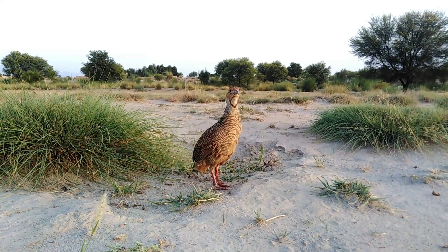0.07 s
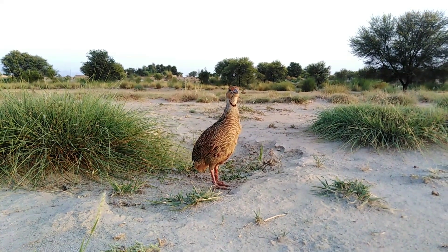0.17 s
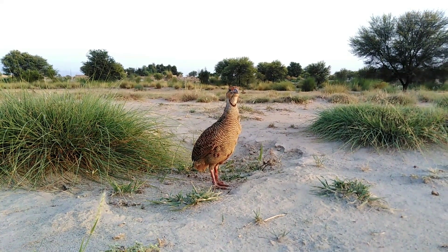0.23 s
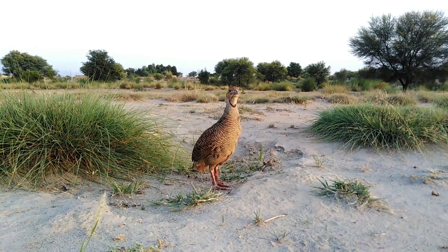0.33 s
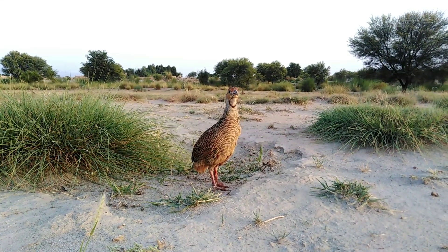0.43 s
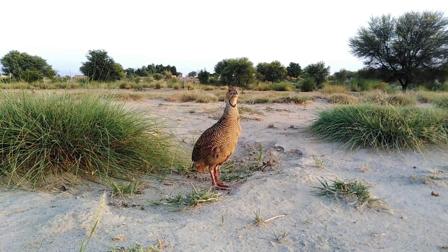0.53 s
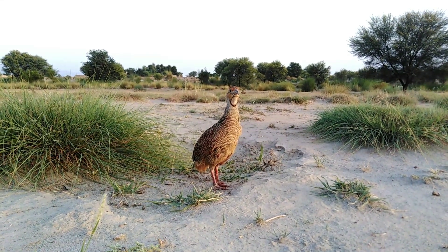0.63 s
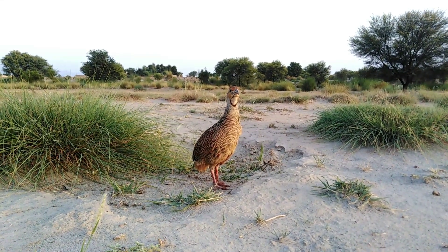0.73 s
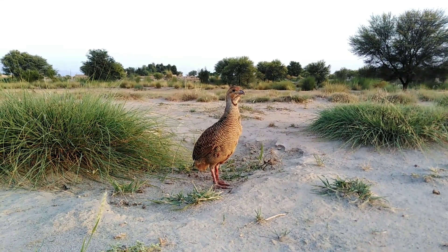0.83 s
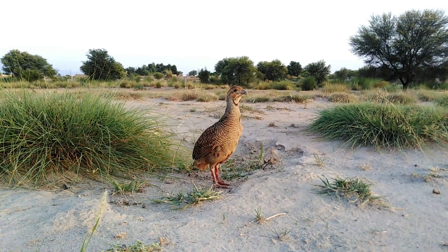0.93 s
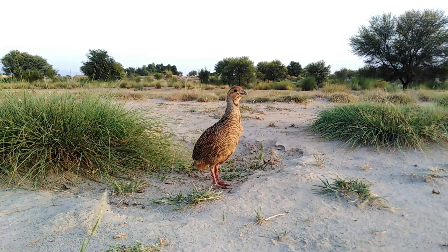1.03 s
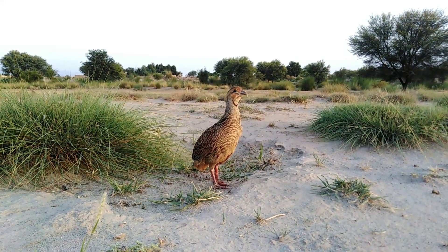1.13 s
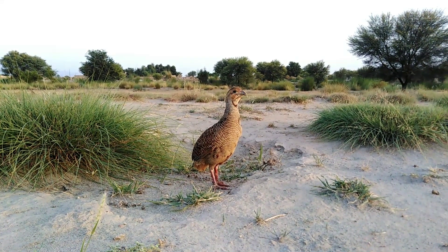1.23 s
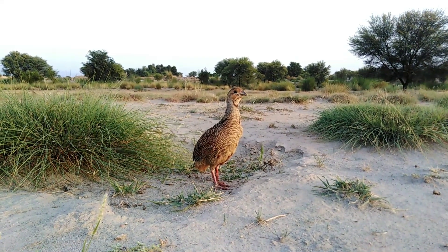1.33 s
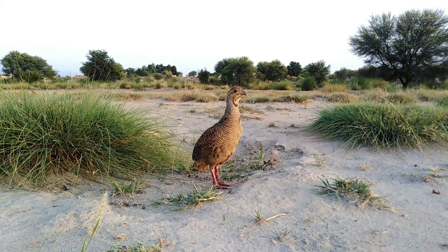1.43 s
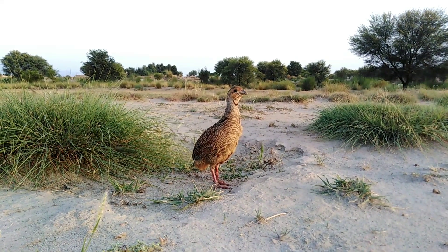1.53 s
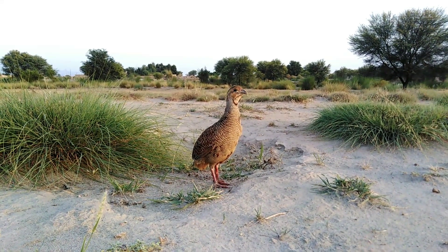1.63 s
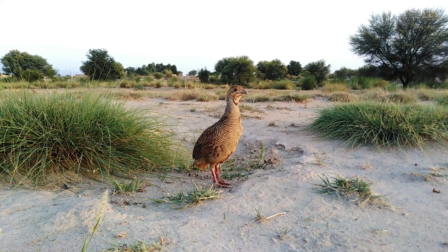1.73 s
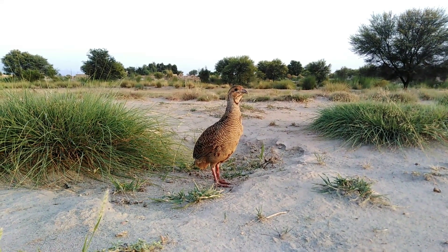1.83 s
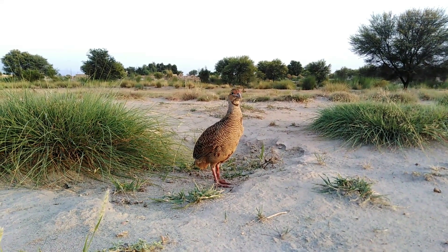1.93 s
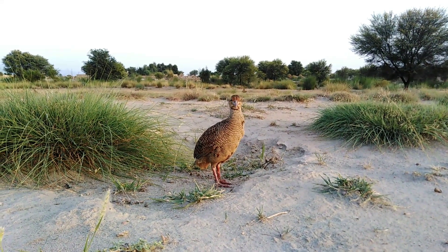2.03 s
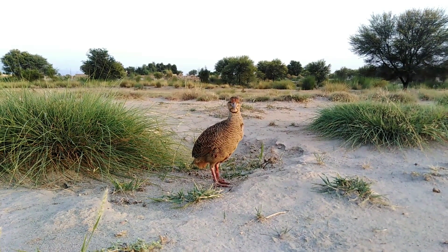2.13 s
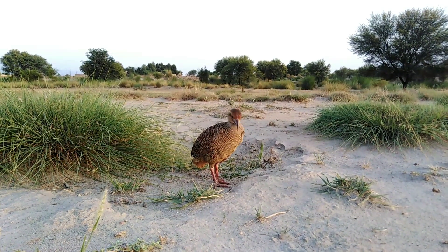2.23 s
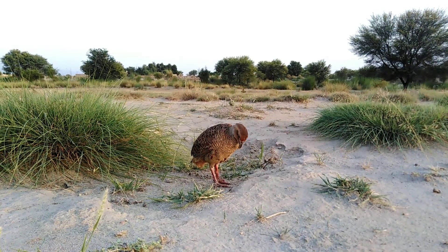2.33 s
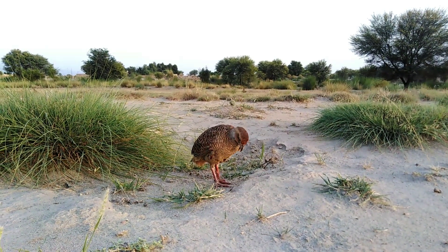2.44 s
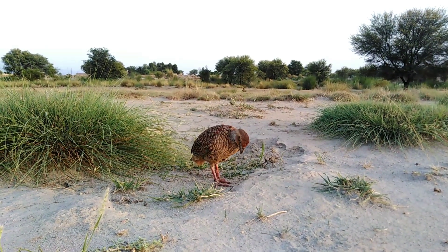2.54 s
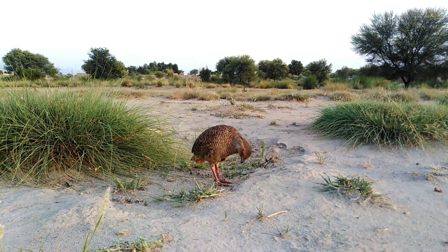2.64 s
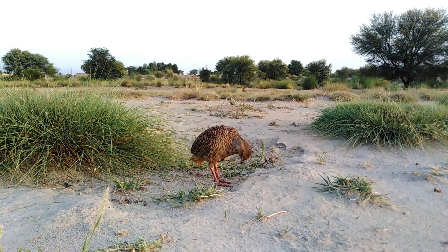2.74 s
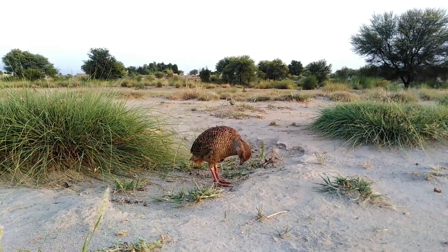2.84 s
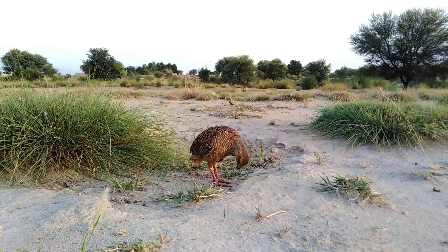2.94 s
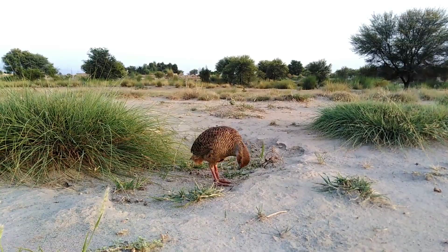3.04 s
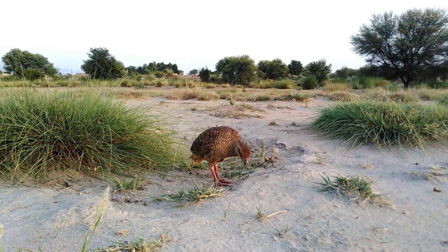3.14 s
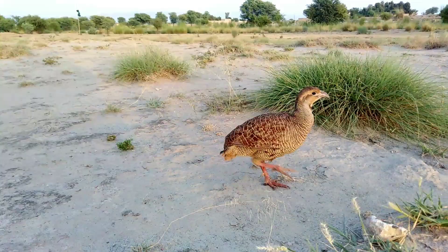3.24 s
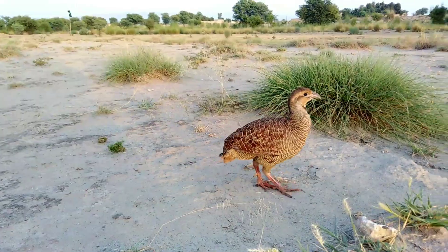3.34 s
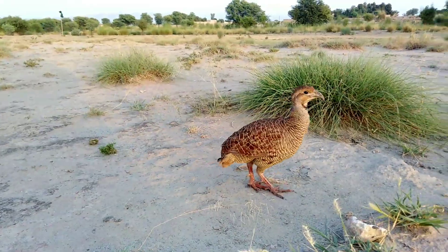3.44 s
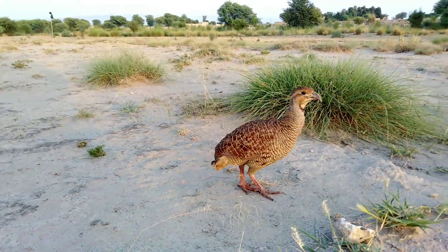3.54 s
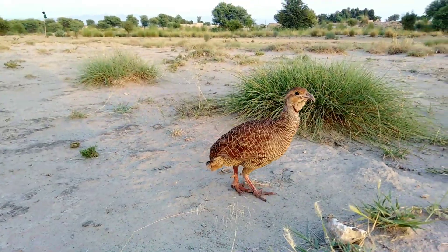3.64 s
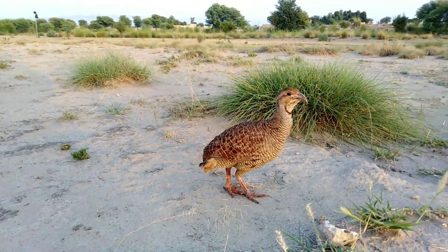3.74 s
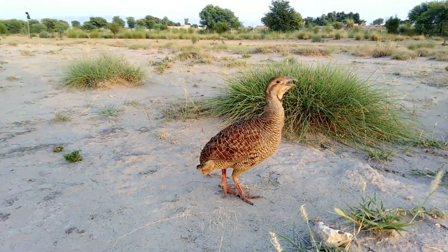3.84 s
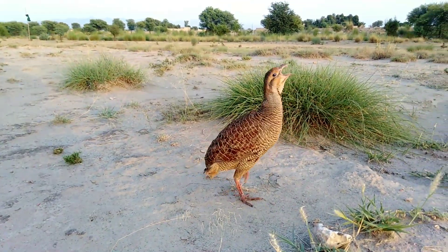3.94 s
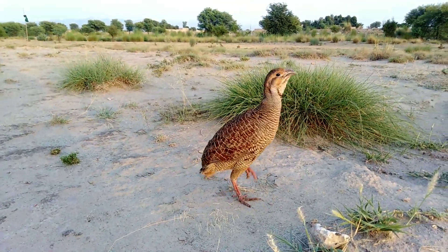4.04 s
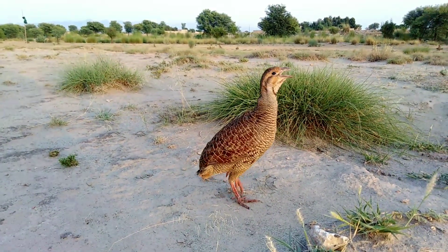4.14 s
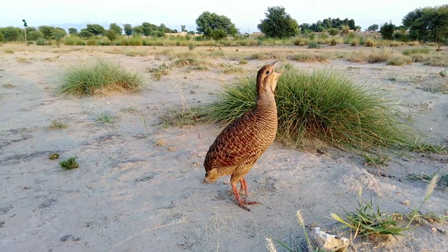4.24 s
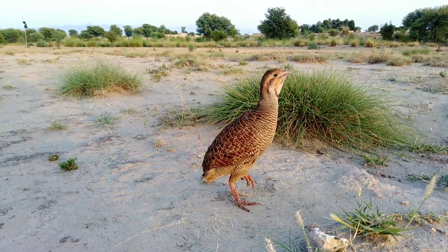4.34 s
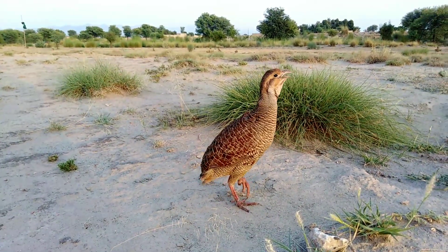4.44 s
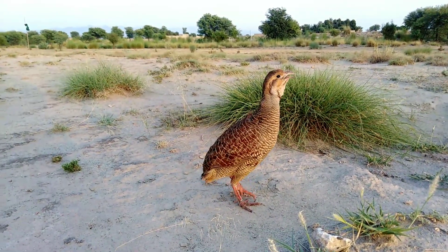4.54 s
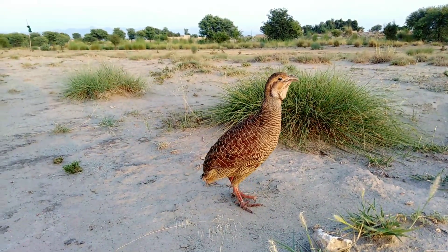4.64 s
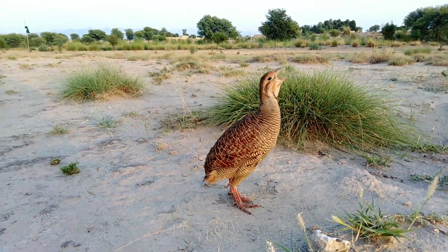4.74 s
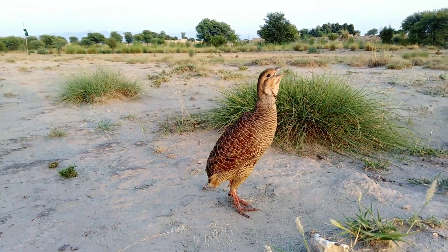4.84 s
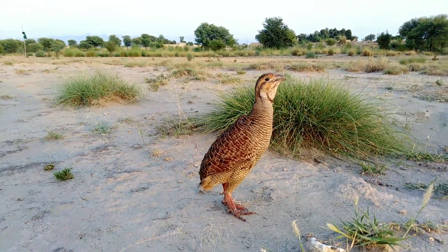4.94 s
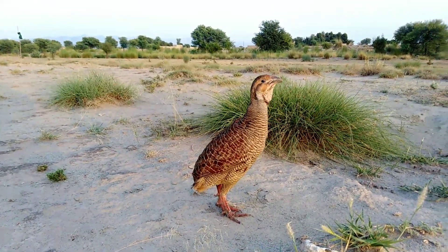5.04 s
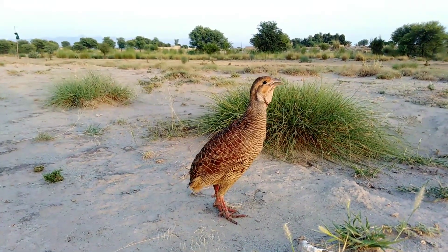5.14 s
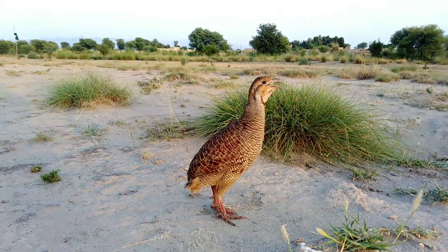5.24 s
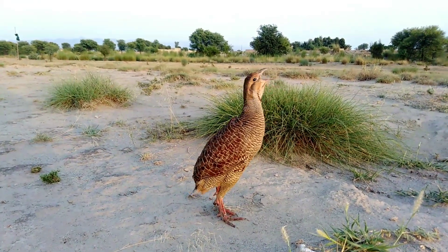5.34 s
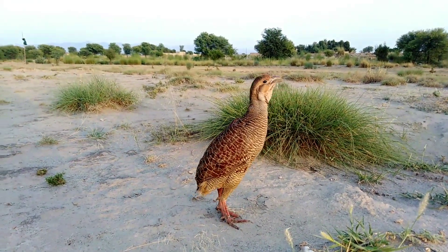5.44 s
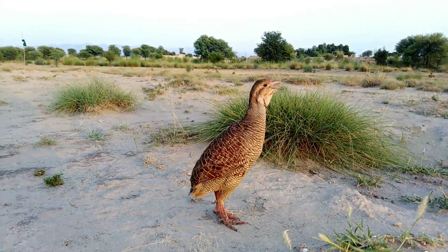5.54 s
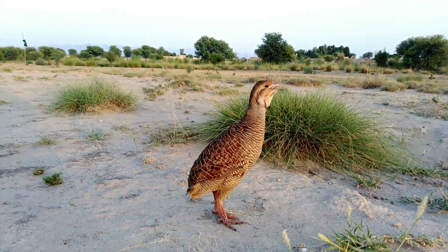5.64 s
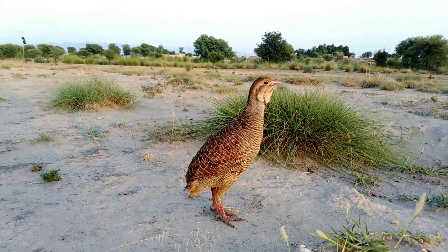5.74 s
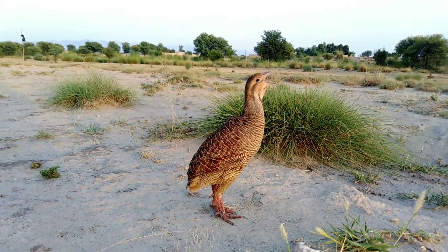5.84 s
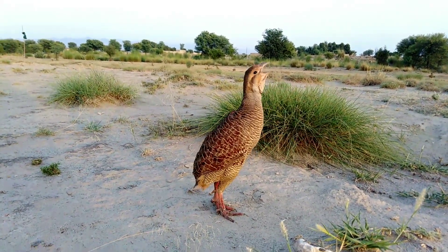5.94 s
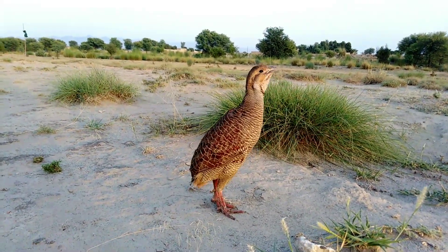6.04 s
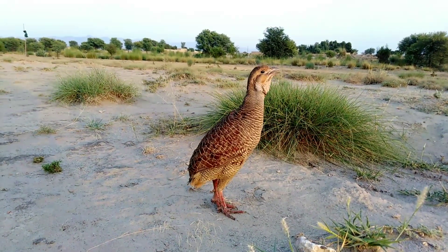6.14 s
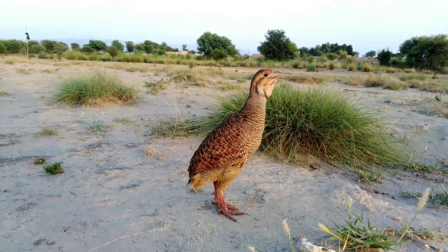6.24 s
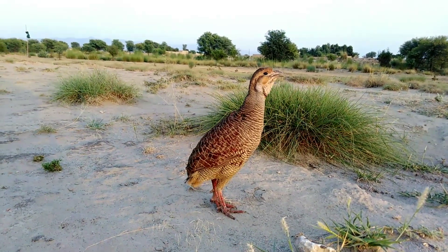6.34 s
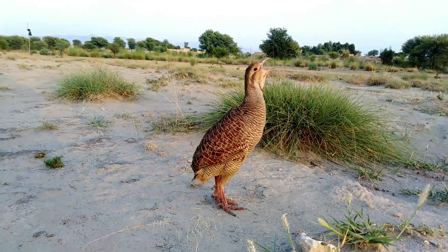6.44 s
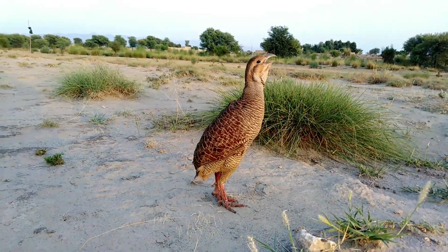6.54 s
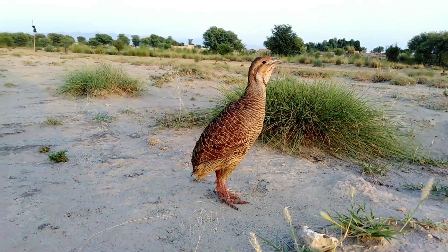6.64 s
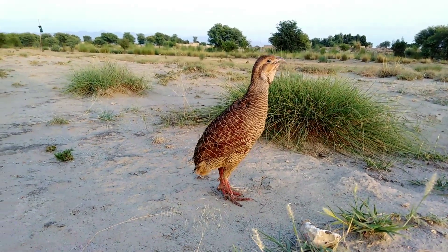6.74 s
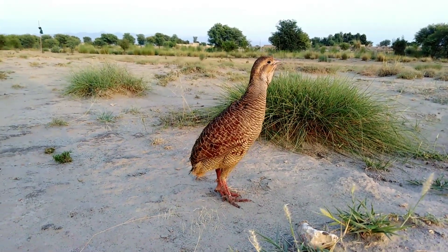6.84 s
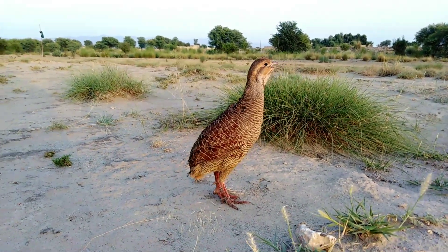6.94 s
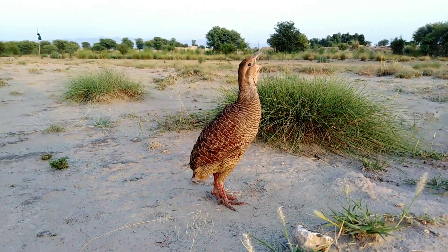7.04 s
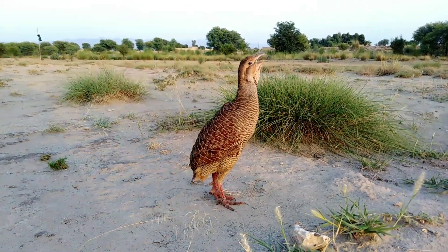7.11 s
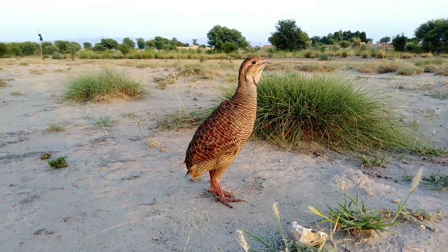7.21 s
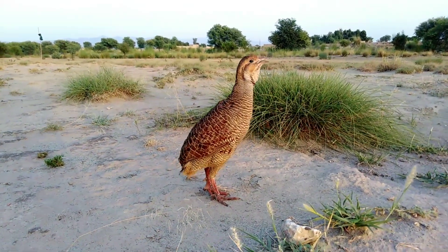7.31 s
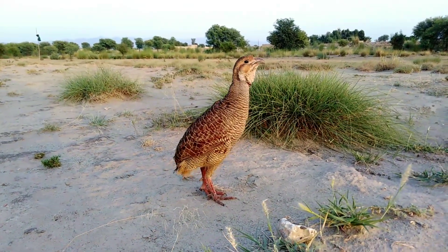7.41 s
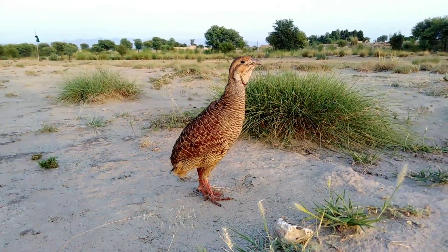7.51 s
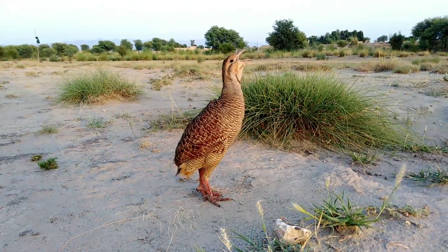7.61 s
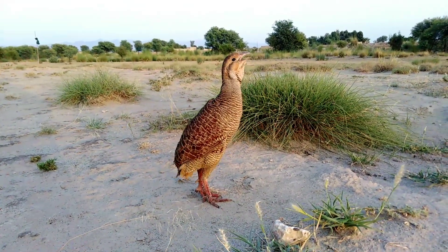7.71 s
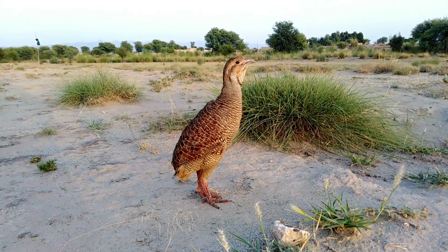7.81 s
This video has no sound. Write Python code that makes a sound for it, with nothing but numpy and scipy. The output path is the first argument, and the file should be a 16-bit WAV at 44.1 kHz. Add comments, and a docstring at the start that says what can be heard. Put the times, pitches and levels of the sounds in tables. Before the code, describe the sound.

A ground bird on open sandy land starts with quiet, falling whimpers and light scuffs, while a crow caws in the distance and a small bird chirps faintly. Then comes one thin whistle and seven quick, harsh three-note phrases, each with a shrill middle note, so close that the microphones distort. A low, far engine rumble continues underneath, and there is only a slight, short echo.

```python
"""A francolin calling on open sandy ground

The bird whimpers softly, whistles, then breaks into a loud three-note phrase, seven times over.
The membranes in its voice box flip between clean tones and harsh chaos, and the calls overload
two close microphones. Far off an engine drones, a small bird chirps and a crow caws.
There are a few light scuffs on the sand, and bushes and ground scatter a short echo."""
import sys
import numpy as np
from scipy import signal
from scipy.fft import rfft, irfft, next_fast_len
from scipy.io import wavfile
from scipy.ndimage import uniform_filter1d

SR = 44100
rng = np.random.default_rng(int(sys.argv[2]) if len(sys.argv) > 2 else 0)


def file_out(sig):
    """Save sig as 16-bit WAV at sys.argv[1]."""
    # one column per channel
    cols = np.atleast_2d(sig).T
    # limit, then scale
    lim = np.clip(cols, -1, 1)
    pcm = np.round(lim * 32767).astype(np.int16)
    wavfile.write(sys.argv[1], SR, pcm)


N = 347054


def amp(db):
    """Turns decibels into a gain to multiply by."""
    return 10 ** (np.asarray(db) / 20)


def unit(x):
    """Scales a signal to an average (rms) level of 1."""
    return x / np.sqrt(np.mean(x ** 2) + 1e-20)


def read(points, hz):
    """Looks up a value between a table's rows, on a log-frequency axis."""
    f, value = np.transpose(points)
    return np.interp(np.log(hz + 1), np.log(f), value)


def add(mix, start_s, sound):
    """Mixes a sound in at its start time."""
    part = mix[:, max(round(start_s * SR), 0):][:, :sound.shape[-1]]
    part += sound[..., :part.shape[-1]]


def shape(x, response):
    """Filters a signal: response gives the gain at each frequency."""
    size = next_fast_len(x.shape[-1] + 1024)
    gain = response(np.fft.rfftfreq(size, 1 / SR))
    return irfft(rfft(x, size) * gain, size)[..., :x.shape[-1]]


def noise(size, spectrum):
    """Noise at level 1 with the given tone colour."""
    return unit(shape(rng.standard_normal(size), lambda f: amp(read(spectrum, f))))


def wander(size, hz):
    """A smooth random wobble, up to about hz times a second."""
    return unit(shape(rng.standard_normal(size), lambda f: np.exp(-(f / hz) ** 2)))


# The engine's rumble, dull early and brighter later. Each row: frequency in Hz, level in dB.
EARLY_RUMBLE = [(25, -27), (48, -17.5), (100, -5.5), (136, 0), (200, -18), (300, -23.5), (450, -41.5),
                (1000, -47.5), (4000, -54), (14000, -58.5)]
LATE_RUMBLE = [(25, -22), (60, -8), (110, -0.5), (160, -8), (250, -17.5), (400, -15), (700, -23.5),
               (1100, -27), (4000, -39.5), (14000, -39.5)]
# Its loudness, with a brief dip between the two. Each row: time in seconds, level in dB.
EARLY_LOUDNESS = [(0, -50.5), (3.17, -50), (3.22, -65), (3.28, -85)]
LATE_LOUDNESS = [(3.27, -110), (3.29, -56), (3.5, -52), (4.498, -47.5), (6, -53), (7.87, -50.5)]
def engine(spectrum, loudness, hum_hz, hum_db, throb, throb_hz, width):
    """A far engine: a throbbing rumble around a wavering hum."""
    t = np.arange(N) / SR
    pitch = hum_hz * (1 + 0.035 * wander(N, 10.3))
    hum = amp(hum_db) * np.sin(2 * np.pi * np.cumsum(pitch) / SR)
    rumble = unit(noise(N, spectrum) + width * noise((2, N), spectrum))
    beat = 1 + throb * np.sin(2 * np.pi * throb_hz * t)
    return amp(np.interp(t, *np.transpose(loudness))) * unit((rumble + hum) * beat)


def slide(length_s, first_hz, last_hz, arch, peak_share, fade_db):
    """Pitch and level of a quiet note: one arched glide that swells to a peak and fades."""
    progress = np.linspace(0, 1, int(length_s * SR))
    pitch = first_hz * (last_hz / first_hz) ** progress * 2 ** (arch * np.sin(np.pi * progress))
    slope_share = np.where(progress < peak_share, peak_share, 1 - peak_share)
    return pitch, fade_db * np.abs(progress - peak_share) / slope_share


def tone(pitch, db, overtone_db, waver):
    """A wavering tone with two overtones, each weaker than the last."""
    phase = 2 * np.pi * np.cumsum(pitch * (1 + waver * wander(len(pitch), 200))) / SR
    partials = sum(amp(overtone_db * k) * np.sin((k + 1) * phase) for k in range(3))
    return amp(db) * unit(partials) * signal.windows.tukey(len(pitch), .05)


# A small bird's notes. Each row: start and length in seconds, first and last pitch in Hz, level in dB.
CHIRP_NOTES = [(.002, 0.042, 5000, 4300, -58), (.045, 0.05, 4720, 7100, -63),
               (0.093, 0.031, 3800, 3340, -59.5), (.675, 0.038, 5000, 4150, -64),
               (2.765, 0.034, 4900, 4450, -65), (2.791, 0.051, 4520, 6800, -57.5),
               (2.83, 0.068, 4700, 3150, -61)]
def chirps():
    """A small bird's quiet, almost pure gliding notes."""
    out = np.zeros((2, N))
    for start, length, first_hz, last_hz, db in CHIRP_NOTES:
        pitch, swell_db = slide(length, first_hz, last_hz, arch=0.018, peak_share=0.35, fade_db=-6)
        add(out, start, tone(pitch, db + swell_db, overtone_db=-35, waver=0.018))
    return out


# Scuffs on the sand. Each row: start in seconds, level in dB, seconds to fade by 60 dB.
SAND_SCUFFS = [(.005, -58.5, 0.51), (1.577, -46.5, 0.053), (3.284, -46.5, 0.19), (3.318, -46, 0.051),
               (3.361, -45, 0.025)]
# The sand's tone colour. Each row: frequency in Hz, level in dB.
SAND_COLOUR = [(300, -14), (1000, -1), (3500, 3), (5500, 0.5), (9000, -8), (14000, -4.5)]
def scuffs():
    """Scuffed sand: gritty bursts of noise that die away."""
    out = np.zeros((2, N))
    t = np.arange(SR // 4) / SR
    for start, db, fade_s in SAND_SCUFFS:
        fade = np.exp(-np.log(1000) * t / fade_s)
        add(out, start, amp(db) * fade * noise((2, len(t)), SAND_COLOUR))
    return out


def syrinx(pitch, rough, jitter, shimmer, breath, chaos_hz, hiss=0.15, dull_db=0):
    """A bird's voice box: roughness shakes its membranes' pitch and swing, and adds breath noise."""
    size = len(pitch)
    chaos = rough ** 1.661  # slight roughness leaves the pitch almost steady
    shaky_pitch = pitch * (1 + jitter * chaos * wander(size, chaos_hz))
    phase = 2 * np.pi * np.cumsum(shaky_pitch) / SR
    swings = np.exp(shimmer * rough * wander((5, size), chaos_hz))
    fade = amp(-dull_db * rough)  # a chaotic swing closes less sharply, so its overtones weaken
    membranes = unit(sum(swing * fade ** k * np.cos((k + 1) * phase) for k, swing in enumerate(swings)))
    return membranes + (hiss + breath * rough) * rng.standard_normal(size)


# The crow's caws. Each row: start and length in seconds, first pitch in Hz, level in dB,
# brightness in dB per octave.
CROW_CAWS = [(0.962, 0.095, 780, -42.5, 11), (1.215, .11, 761, -44.5, 10), (2.637, .1, 761, -51, -6),
             (2.885, 0.11, 783, -52, -15)]
# How its throat colours them. Each row: frequency in Hz, gain in dB.
CROW_COLOUR = [(400, -33), (750, 8), (1050, 7.5), (1550, 7.5), (2300, -5.5), (3400, -35), (4500, -31),
               (7000, -52)]
def crow():
    """Hoarse, breathy caws that arch in pitch and level, and end lower than they begin."""
    out = np.zeros((2, N))
    for start, length, hz, db, bright_db in CROW_CAWS:
        pitch, swell_db = slide(length, hz, hz * .86, arch=0.101, peak_share=0.44, fade_db=-17)
        source = syrinx(pitch, rough=0.54, jitter=0.059, shimmer=0.75, breath=2.9, chaos_hz=200)
        voice = shape(source, lambda f: amp(read(CROW_COLOUR, f) + bright_db * np.log2(1 + f / hz)))
        add(out, start, amp(db + swell_db) * unit(voice) * signal.windows.tukey(len(pitch), .2))
    return out


# The francolin's whimpers. Each row: start and length in seconds, first and last pitch in Hz,
# level in dB, arch of the pitch in octaves.
WHIMPER_NOTES = [(2.114, 0.056, 1370, 1030, -48, 0), (2.151, 0.056, 1232, 1124, -42.5, 0.32),
                 (2.203, 0.053, 1150, 917, -46, -0.069), (2.259, 0.034, 1005, 950, -53, .48),
                 (2.311, 0.073, 908, 405, -45.5, -0.21), (3.282, 0.04, 703, 597, -39, -.08),
                 (3.557, 0.059, 1323, 980, -42, 0.33), (3.612, .17, 642, 308, -38, -.22)]
def whimpers(hoarse_hz=800, hoarse=0.21, muffle_hz=1500):
    """Soft falling whines through a closed beak, which turn hoarse as the pitch sinks."""
    out = np.zeros((2, N))
    for start, length, first_hz, last_hz, db, arch in WHIMPER_NOTES:
        pitch, swell_db = slide(length, first_hz, last_hz, arch, peak_share=.3, fade_db=-7)
        rough = hoarse / (1 + (pitch / hoarse_hz) ** 4)
        source = syrinx(pitch, rough, jitter=.1, shimmer=0.97, breath=.5, chaos_hz=200,
                        hiss=.025, dull_db=42)
        voice = unit(shape(source, lambda f: 1 / (1 + (f / muffle_hz) ** 3)))
        add(out, start, amp(db + swell_db) * voice * signal.windows.tukey(len(pitch), .1))
    return out


# Whistles before the first phrase. Each row: start and length in seconds, pitch in Hz, level in dB,
# swell time in seconds, how far below pitch it starts in Hz.
WHISTLE_NOTES = [(3.652, 0.253, 3460, -13.5, 0.035, 329), (3.913, 0.019, 3460, -21, .001, 3.5)]
# The rush of air around them. Each row: frequency in Hz, level in dB.
AIR_COLOUR = [(180, -70), (300, -43.5), (681, -30.5), (800, -31.5), (1650, -26), (2310, -30.5),
              (3240, -23.5), (3510, -9), (3810, -25.5), (5970, -31), (7130, -30.5), (8640, -48.5),
              (14000, -50.5)]
def whistle(flutter_db=0.95, pan_db=5.0, lift_hz=170, lift_s=0.012, air_from_s=3.648, air_to_s=3.94):
    """A thin, fluttering whistle in a rush of air: it scoops up as it swells and lifts at its end."""
    out = np.zeros((2, N))
    for start, length, hz, db, swell_s, scoop_hz in WHISTLE_NOTES:
        t = np.arange(0, length, 1 / SR)
        slack = np.exp(-t / swell_s)
        end_lift = lift_hz * np.exp((t - length) / lift_s)
        pitch = (hz - scoop_hz * slack + end_lift) * (1 + 0.007 * wander(len(t), 22))
        level_db = db - 36 * slack + flutter_db * wander(len(t), 67)
        note = tone(pitch, level_db, overtone_db=-32.5, waver=0.0028)
        add(out, start, note * amp([[pan_db], [-pan_db]]))
    size = int((air_to_s - air_from_s) * SR)
    add(out, air_from_s, amp(-27) * signal.windows.tukey(size, .12) * noise((2, size), AIR_COLOUR))
    return out


def gate(t, start, end, edge_s):
    """1 between start and end, 0 outside, with soft edges."""
    return (np.tanh((t - start) / edge_s) - np.tanh((t - end) / edge_s)) / 2


def gesture(locks, length_s, attack_s, release_s, hold_db, low_hz, high_hz, climb_s, harsh,
            break_db, bend, break_s=0.0053, break_hz=1837, flip_s=0.0011, linger_s=0.0039):
    """Pitch, roughness and effort of a harsh cry whose membranes briefly lock into clear tones."""
    t = np.arange(0, length_s, 1 / SR)
    letting_go = np.clip(1 - (length_s - t) / release_s, 0, 1)
    effort_db = hold_db - 30.5 * np.exp(-t / attack_s) - 39 * letting_go ** 2.2
    pitch = low_hz + (high_hz - low_hz) * gate(t, climb_s, length_s - release_s, edge_s=0.0023)
    rough = harsh + (1 - harsh) * letting_go
    # around each lock the voice breaks: a high pitch drops to break_hz and the level shifts
    breaking = np.max([gate(t, start - break_s, end + break_s, flip_s) for start, end, *_ in locks], 0)
    pitch -= breaking * np.maximum(pitch - break_hz, 0)
    effort_db += break_db * breaking
    for start, end, first_hz, last_hz, lift_db, lock_rough in locks:
        locked = gate(t, start, end, flip_s)
        glide = first_hz + (last_hz - first_hz) * np.clip((t - start) / (end - start), 0, 1) ** bend
        # when a lock lets go, the pitch takes a moment to slide away
        lingering = (t > (start + end) / 2) * np.exp(-np.maximum(t - end, 0) / linger_s)
        pitch += np.maximum(locked, lingering) * (glide - pitch)
        rough += locked * (lock_rough - rough)
        effort_db += locked * (lift_db - break_db)
    return pitch, rough, effort_db


def stretched(controls, factor):
    """The same control curves, played slower or faster."""
    steps = np.arange(len(controls[0]))
    return [np.interp(np.arange(0, len(steps), 1 / factor), steps, curve) for curve in controls]


def microphones(voice, balance, twist, lag_s=.000025, twist_hz=2310, width_hz=330):
    """The right microphone hears the call later, and direct and ground paths meet differently there."""
    def phase_lag(f):
        return 2 * np.pi * f * lag_s + twist * np.exp(-((f - twist_hz) / width_hz) ** 4)
    left = shape(voice, lambda f: amp(read(balance, f) / 2))
    right = shape(voice, lambda f: amp(-read(balance, f) / 2) * np.exp(-1j * phase_lag(f)))
    return np.array([left, right])


def syllables(calls, controls, colour, balance, ragged=.07, **voice_settings):
    """Plays one kind of cry at each of its times: voice box, then throat and beak, then microphones."""
    out = np.zeros((2, N))
    for start, stretch, tune, db, twist in calls:
        pitch, rough, effort_db = stretched(controls, stretch)
        # no two cries are quite alike: effort and roughness drift by chance
        effort_db += 1.5 * wander(len(pitch), 54)
        rough += ragged * np.abs(wander(len(pitch), 77))
        source = syrinx(pitch * tune, np.clip(rough, 0, 1), **voice_settings)
        voice = shape(source, lambda f: amp(read(colour, f)))
        # effort alone sets the loudness, whichever overtone the throat favours
        voice /= np.sqrt(uniform_filter1d(voice ** 2, size=260) + 1e-9)
        voice *= amp(effort_db + db)
        add(out, start, microphones(voice, balance, twist))
    return out


# The opening cry. Each row: start in seconds, length factor, pitch factor, gain in dB,
# phase twist between the microphones near the shriek's pitch in radians.
OPENER_CALLS = [(3.932, 0.98, 0.99, 1.5, -0.5)]
# Its locks into clear tones, before those factors. Each row: start and end in seconds into the cry,
# first and last pitch in Hz, lift in dB, roughness from 0 to 1.
OPENER_TONES = [(.037, .069, 1846, 1883, 2.5, 0), (.089, .134, 1880, 1348, -0.5, 0)]
# How throat and beak colour it. Each row: frequency in Hz, gain in dB.
OPENER_COLOUR = [(500, -29.5), (1000, -18), (1500, 2), (1900, -8), (2700, -1.5), (3700, -19.5),
                 (4700, -17.5), (5600, -7.5), (6600, -18), (9000, -20.5), (14000, -53.5)]
# Stereo balance of the opener and the rasps. Each row: frequency in Hz, left over right in dB.
OPENER_RASP_BALANCE = [(1400, -5.5), (2000, -5), (2450, -8), (3000, 4.5), (4900, 4.5), (10000, 6)]
def opener():
    """The harsh cry that starts the first phrase; it clears twice, the second time into a falling tone."""
    cry = gesture(OPENER_TONES, length_s=.154, attack_s=0.0036, release_s=0.018, hold_db=-7.5,
                  low_hz=1500, high_hz=2530, climb_s=0.016, harsh=0.53, break_db=-8.5, bend=1.3)
    return syllables(OPENER_CALLS, cry, OPENER_COLOUR, OPENER_RASP_BALANCE, jitter=0.075,
                     shimmer=0.88, breath=1.0, hiss=0.13, dull_db=-0.5, chaos_hz=498)


# The shrieks' calls, clear tone, throat colour and stereo balance. Rows read as for the opener.
SHRIEK_CALLS = [(4.076, 0.94, 0.98, 0.0074, 2.99), (4.611, 0.95, 0.99, 0.0069, 2.7),
                (5.130, 0.93, 0.99, 0.017, 2.74), (5.691, 0.94, 0.99, 0.0067, 2.85),
                (6.264, 0.98, 0.99, 0.014, 2.5), (6.841, 0.96, 0.99, 0.028, 1.74),
                (7.428, 0.94, 0.99, 0.0076, 0.7)]
SHRIEK_TONES = [(.046, .129, 2288, 2352, 7.8, 0.034)]
SHRIEK_COLOUR = [(500, -29), (950, 0.5), (1450, -14), (2300, 8), (3100, 3.5), (3800, -1.5), (4600, -6),
                 (5700, -4), (7500, -15.5), (14000, -16.5)]
SHRIEK_BALANCE = [(1400, -3), (2300, 15.5), (3000, 12), (4600, 4.5), (6900, 23.5), (10000, 11.5)]
def shrieks():
    """The loud middle note of each phrase: one long piercing tone between two harsh bursts."""
    cry = gesture(SHRIEK_TONES, length_s=.172, attack_s=0.0049, release_s=.039, hold_db=-2.0,
                  low_hz=1422, high_hz=1600, climb_s=0.012, harsh=.7, break_db=-3.0, bend=0.8)
    return syllables(SHRIEK_CALLS, cry, SHRIEK_COLOUR, SHRIEK_BALANCE, ragged=0.037, jitter=0.1022,
                     shimmer=0.73, breath=0.91, hiss=0.05, dull_db=2.0, chaos_hz=409)


# The rasps' calls, clear tones and throat colour. Rows read as for the opener.
RASP_CALLS = [(4.246, 0.81, 0.94, 0.76, -0.69), (4.764, 0.92, 0.96, 0.33, -0.98),
              (5.317, 0.96, 0.99, 0.79, -0.99), (5.886, 0.99, 0.99, 0.77, -0.69),
              (6.457, 1.0, 0.99, 1, 0.31), (7.051, 0.98, 1, 1, 0.68), (7.630, 0.97, 0.99, 0.5, -0.87)]
RASP_TONES = [(.008, .02, 1749, 1785, 2.6, 0.13), (.046, .068, 2464, 2475, 5.6, 0.043),
              (.098, .143, 2460, 2060, 1.5, .03)]
RASP_COLOUR = [(500, -54.5), (1000, -4), (1450, 2), (2400, 2), (2800, 5), (3650, -3.5), (4300, 1),
               (5000, 10.5), (5600, 12), (6500, 1.5), (7500, -3.5), (14000, -40)]
def rasps():
    """The last note of each phrase: a very rough cry that locks into a tone three times."""
    cry = gesture(RASP_TONES, length_s=.174, attack_s=.003, release_s=.028, hold_db=-9.5,
                  low_hz=1420, high_hz=2613, climb_s=.018, harsh=0.83, break_db=-0.5, bend=1.7)
    return syllables(RASP_CALLS, cry, RASP_COLOUR, OPENER_RASP_BALANCE, ragged=0.1043, jitter=0.12,
                     shimmer=0.44, breath=0.39, hiss=0.22, dull_db=14.5, chaos_hz=499)


# The chucks' calls, clear tones, throat colour and stereo balance. Rows read as for the opener.
CHUCK_CALLS = [(4.468, 0.93, 0.94, -0.69, -0.92), (5.011, 0.97, 0.97, 0.39, -0.48),
               (5.575, 0.95, 0.98, 0.29, 0.048), (6.147, 0.96, 0.98, -0.032, 0.48),
               (6.720, 0.98, 1.0, 0.57, 0.64), (7.310, 0.97, 0.96, -0.69, 0.53)]
CHUCK_TONES = [(.022, .034, 1494, 1510, -1.5, 0.27), (.035, .06, 2027, 1673, -4.5, 0.033)]
CHUCK_COLOUR = [(500, -32), (1000, 0), (1450, 7), (2000, -2), (2900, -7.5), (3700, -15), (4500, -20),
                (5700, 1.5), (6600, -11), (9000, -23.5), (14000, -31)]
CHUCK_BALANCE = [(1400, -4), (2000, -8), (3000, 5.5), (4000, -4.5), (5700, 6.5), (10000, -5)]
def chucks():
    """The short, rough note that starts every phrase after the first."""
    cry = gesture(CHUCK_TONES, length_s=0.075, attack_s=0.003, release_s=0.031, hold_db=-7,
                  low_hz=1388.6, high_hz=1483, climb_s=.005, harsh=0.677, break_db=0.5, bend=2.4)
    return syllables(CHUCK_CALLS, cry, CHUCK_COLOUR, CHUCK_BALANCE, jitter=0.133,
                     shimmer=0.81, breath=1.0, hiss=0.33, dull_db=4.0, chaos_hz=402)


# The stutter's call and clear tone. Rows read as for the opener.
STUTTER_CALLS = [(4.579, 0.89, 0.91, 0.0014, 0.74)]
STUTTER_TONES = [(.02, .038, 1462, 1545, 4, 0.17)]
def stutter():
    """One extra, breathy chuck just before the second shriek."""
    cry = gesture(STUTTER_TONES, length_s=.05, attack_s=.003, release_s=0.013, hold_db=-10.5,
                  low_hz=1529, high_hz=1452, climb_s=0.011, harsh=0.63, break_db=2.5, bend=1.4)
    return syllables(STUTTER_CALLS, cry, CHUCK_COLOUR, CHUCK_BALANCE, jitter=0.078,
                     shimmer=0.7, breath=1.0, hiss=1.0, dull_db=12, chaos_hz=400)


# How long the echo lasts. Each row: frequency in Hz, seconds to fade by 60 dB.
ECHO_FADE = [(300, .45), (2000, 0.27), (5000, 0.27), (12000, 0.2)]
def field_echo(sound, echoes_per_s=2000):
    """Bushes and ground scatter the sound into sparse echoes whose treble dies first."""
    taps = rng.standard_normal((2, SR // 2)) * (rng.random((2, SR // 2)) < echoes_per_s / SR)
    hz, t, bands = signal.stft(taps, SR, nperseg=256)
    fade = np.exp(-np.log(1000) * t / read(ECHO_FADE, hz)[:, None])
    tail = signal.istft(bands * fade, SR)[1]
    return signal.fftconvolve(sound, tail / np.linalg.norm(tail[0]), axes=1)[:, :N]


def scene():
    """The francolin's loud calls close and dry, the quiet sounds echoing, the engine behind them all."""
    near = opener() + stutter() + chucks() + rasps() + whistle()
    loud = shrieks()
    soft = whimpers() + scuffs()
    far = crow() + chirps()
    early_drone = engine(EARLY_RUMBLE, EARLY_LOUDNESS, hum_hz=130.5, hum_db=-2,
                         throb=0.14, throb_hz=12.0, width=0.51)
    late_drone = engine(LATE_RUMBLE, LATE_LOUDNESS, hum_hz=114, hum_db=-1.5,
                        throb=0.35, throb_hz=4.0, width=.9)
    # the shriek is thrown upward, so less of it scatters back from the bushes
    echo = field_echo(amp(-37.5) * near + amp(-43.5) * loud + amp(-8.0) * soft + amp(-3.0) * far)
    return near + loud + soft + far + echo + early_drone + late_drone


def record(dry, ceiling=0.63, lopsided=0.17, low_hz=8, high_hz=14400):
    """The microphones overload hard and a little unevenly; the lowest bass and top treble are cut."""
    upsampled = signal.resample_poly(dry, 160, 147, axis=1) / ceiling
    flattened = upsampled / (1 + np.abs(upsampled) ** 10) ** (1 / 10)
    uneven = flattened + lopsided * flattened ** 4 * (flattened > 0)
    clipped = ceiling * signal.resample_poly(uneven, 147, 160, axis=1)[:, :N]
    bass_cut = signal.lfilter(*signal.butter(1, low_hz, "high", fs=SR), clipped)
    treble_filter = signal.firwin(255, high_hz, window=("kaiser", 7), fs=SR)
    return signal.oaconvolve(bass_cut, treble_filter[None], "same")


dry = scene()
out = record(dry)
file_out(out)
```